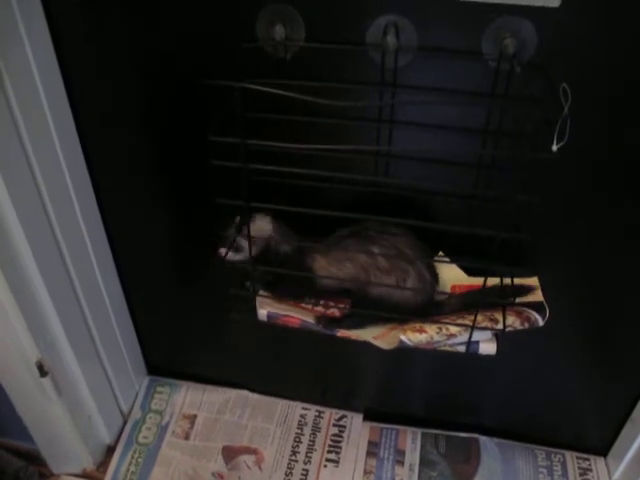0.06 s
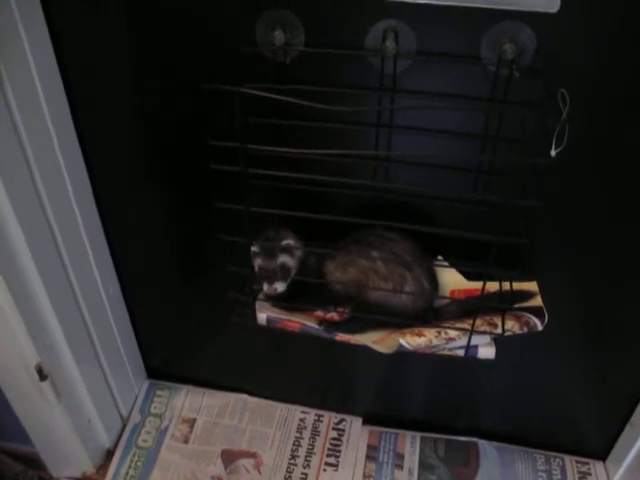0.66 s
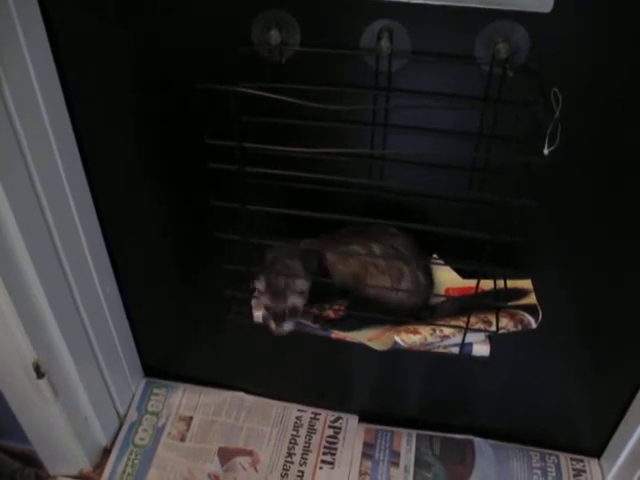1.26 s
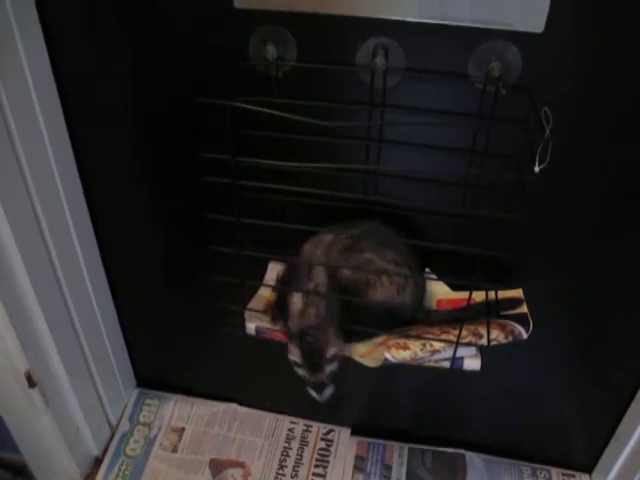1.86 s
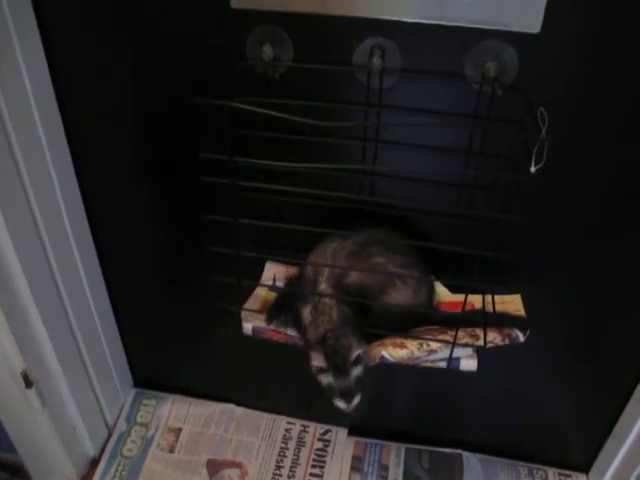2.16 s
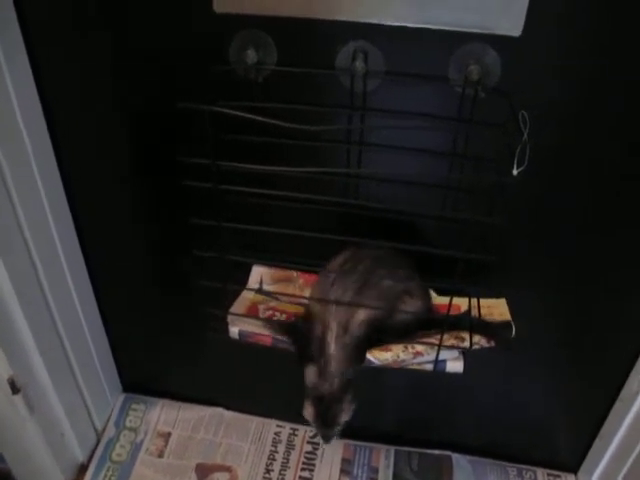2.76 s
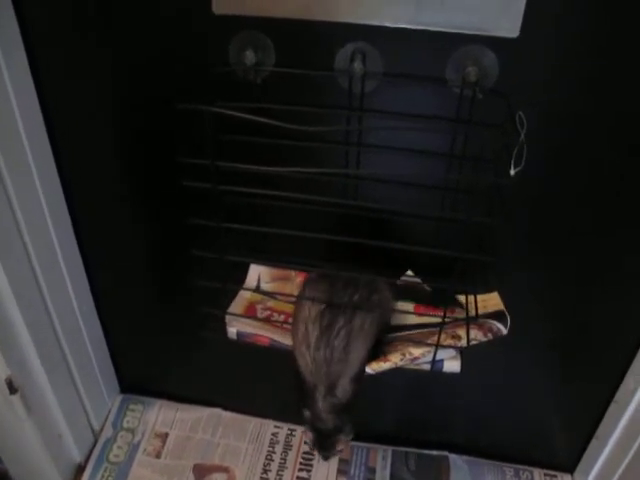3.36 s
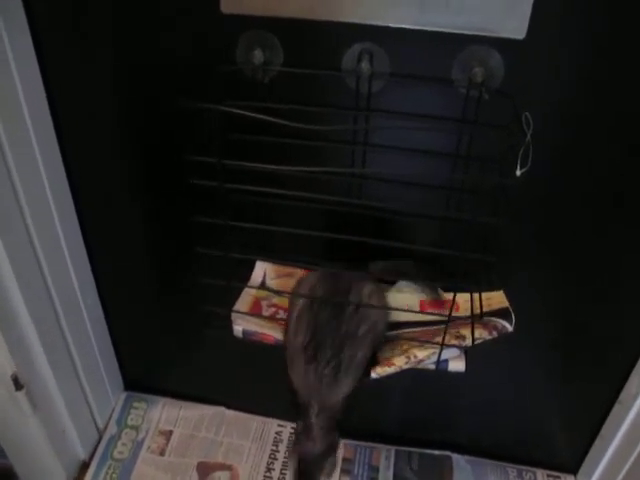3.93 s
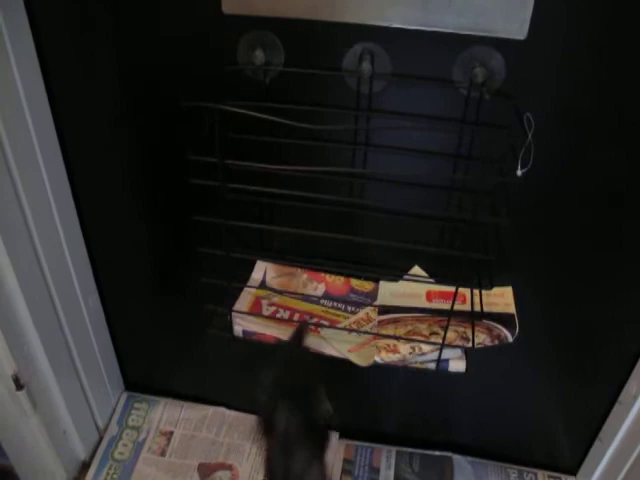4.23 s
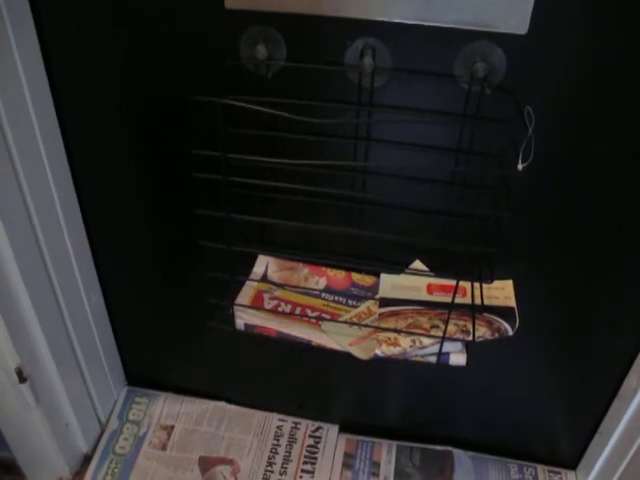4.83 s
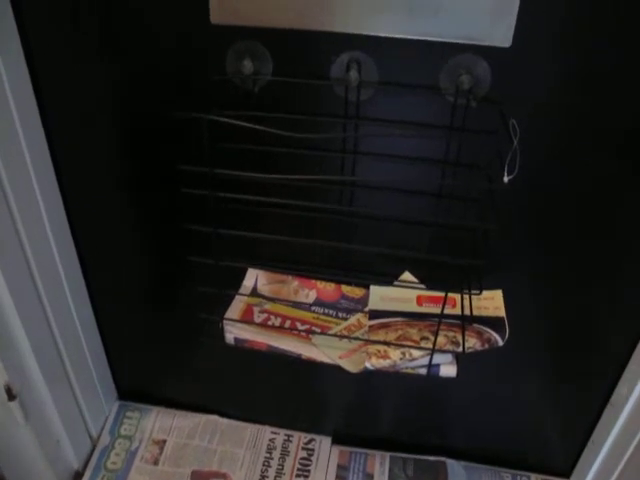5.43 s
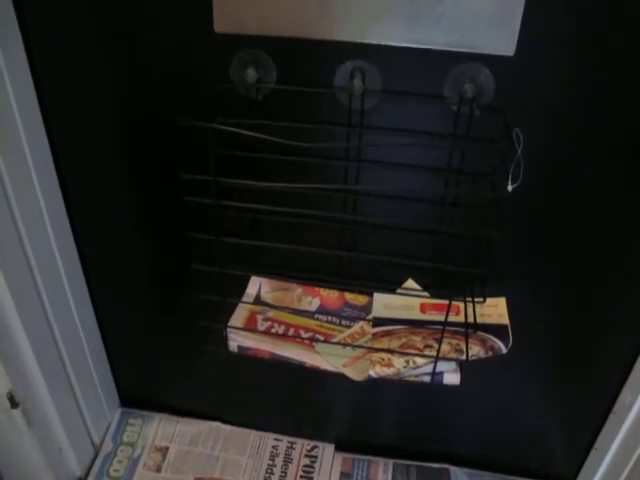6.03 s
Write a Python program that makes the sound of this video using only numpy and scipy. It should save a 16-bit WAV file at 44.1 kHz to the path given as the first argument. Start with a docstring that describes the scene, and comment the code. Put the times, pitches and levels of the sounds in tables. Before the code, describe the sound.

A ferret rustles paper in a wire basket, then climbs out with a loud crackle and a rattle against a door.

```python
"""In a small hall, over a soft hush, a low hum and a thin electronic whine, a ferret shifts on paper
leaflets in a wire mail basket hung on a door. Friction makes the paper rustle; creases crack and sheets
buckle under its paws. Stick-slip gives a squeak on the wire, a creak in a loaded sheet, then claw scrapes.
About four seconds in, the ferret slides over the rim and the basket rattles against the door.
It drops onto newspapers with a soft thud, and the rustling goes on faintly."""
import sys
import numpy as np
from scipy import signal
from scipy.fft import rfft, irfft, next_fast_len
from scipy.io import wavfile
from scipy.ndimage import map_coordinates

SR = 44100
rng = np.random.default_rng(int(sys.argv[2]) if len(sys.argv) > 2 else 0)


def digitize_waveform(pressure):
    """Quantize a signal to 16-bit integers and store it at the path in sys.argv[1].

    Rows of a 2-D input are taken as channels; values are limited to [-1, 1].
    """
    field = np.atleast_2d(pressure).T
    bounded = np.clip(field, -1, 1)
    quanta = np.round(bounded * 32767).astype(np.int16)
    wavfile.write(sys.argv[1], SR, quanta)


N = 268566


def amp(db):
    """Amplitude ratio of a level in decibels."""
    return 10 ** (np.asarray(db) / 20)


def unit(x):
    """Normalisation to an rms of 1."""
    return x / np.sqrt(np.mean(x ** 2) + 1e-20)


def along(points, hz):
    """Interpolation of (frequency [Hz], value) points on a logarithmic frequency axis."""
    f, v = np.transpose(points)
    return np.interp(np.log(hz + 1), np.log(f + 1), v)


def wobble(rate):
    """Random modulation: a smooth curve through `rate` random values a second."""
    return map_coordinates(rng.standard_normal(int(N * rate / SR) + 4), [np.arange(N) * rate / SR])


def colour(x, spectrum, size=4096):
    """Minimum-phase filtering to a given spectrum, conserving the power of white noise."""
    gain = unit(amp(along(spectrum, np.fft.rfftfreq(size, 1 / SR))))
    cepstrum = irfft(np.log(gain + 1e-6))
    cepstrum[1:size // 2] *= 2
    cepstrum[size // 2 + 1:] = 0
    return signal.fftconvolve(x, irfft(np.exp(rfft(cepstrum))))[:len(x)]


def fade(t, t60):
    """Exponential decay by 60 dB in t60 seconds."""
    return np.exp(-np.log(1000) * t / np.maximum(t60, 1e-4))


def add(track, s, sound):
    """Superposition of a sound on the track from time s."""
    part = track[max(round(s * SR), 0):][:len(sound)]
    part += sound[:len(part)]


def grains(count, rate, spread_db, smooth):
    """Shot noise: `rate` uneven impulses a second over a share of smooth noise, at an rms of 1."""
    cracks = np.zeros(count)
    at = np.flatnonzero(rng.random(count) < rate / SR)
    sizes = amp(spread_db * np.clip(rng.standard_normal(len(at)), -2, 2))
    cracks[at] = sizes * rng.choice([-1, 1], len(at))
    return unit(unit(cracks) + smooth * rng.standard_normal(count))


# Reverberation time of the hall: (frequency [Hz], T60 [s])
HALL_DECAY = [(150, 0.9), (1000, 0.42), (4000, 0.22), (12000, 0.17)]
def hall(x, wet_db, near_db=-6, near_t60=0.046):
    """Reverberation: direct sound, early reflections from door and walls, and a short diffuse tail."""
    hz, t, noise = signal.stft(rng.standard_normal(SR // 2), SR, nperseg=256)
    tail = signal.istft(noise * fade(t, along(HALL_DECAY, hz)[:, None]), SR, nperseg=256)[1]
    t = np.arange(len(tail)) / SR
    tail *= 1 - np.exp(-t / 0.0016)
    walls = grains(len(t), rate=1500, spread_db=6, smooth=0.79) * fade(t, near_t60) * (t > 0.002)
    response = amp(wet_db) * tail / np.linalg.norm(tail) + amp(near_db) * walls / np.linalg.norm(walls)
    response[0] += 1  # direct sound
    return signal.fftconvolve(x, response)


# Spectrum of the room hush: (frequency [Hz], relative density [dB])
HUSH_SPECTRUM = [(25, -28), (60, -15.5), (100, -5), (140, -5.5), (300, -4), (620, -4), (900, -7),
                 (1400, -9.5), (4000, -13), (6000, -17), (10500, -20.5), (15500, -28)]
def background(hush_db=-63.7, hum_hz=216, hum_db=-77, whine_hz=5880, whine_db=-70):
    """Ambient noise: a broadband hush and two slightly modulated tones, a hum and an electronic whine."""
    hush = amp(hush_db + 0.125 * wobble(4.3)) * colour(rng.standard_normal(N), HUSH_SPECTRUM)
    hum_gain = amp(hum_db + 0.47 * wobble(2.57))
    hum = np.sin(2 * np.pi * np.cumsum(hum_hz + 3 * wobble(3.6)) / SR)
    whine_gain = amp(whine_db + 0.42 * wobble(7.8))
    whine = np.sin(2 * np.pi * np.cumsum(whine_hz + 1.42 * wobble(6.6)) / SR)
    return hush + hum_gain * hum + whine_gain * whine


# Steady drag of the body over the paper: (time [s], relative level [dB])
BODY_DRAG = [(0, -62.5), (0.22, -64.5), (0.32, -73), (0.55, -82), (1.11, -79), (1.22, -64), (1.5, -63),
             (1.58, -77), (1.72, -59.5), (2.11, -60), (2.19, -71), (3.35, -64), (3.52, -61), (4.5, -59.5),
             (4.62, -70), (5.33, -68), (5.62, -61.5), (6.09, -60.5)]
# Pushes of paw or flank: (peak time [s], length [s], relative level [dB], sheet over surface [dB])
PUSHES = [(0.2, 0.093, -55, -2.5), (1.735, 0.183, -56.5, -3), (1.876, 0.073, -55.5, -4.5),
          (2.294, 0.25, -58, 1), (2.484, 0.39, -62, 0), (2.794, 0.12, -52.5, 0), (2.99, 0.062, -57, 3.5),
          (3.1, 0.13, -53, 2.5), (3.184, 0.12, -50.5, 2), (3.663, 0.084, -46.5, 4), (3.947, 0.09, -43.5, 1),
          (4.059, 0.11, -33.5, 0), (4.171, 0.048, -32.5, -1), (4.232, 0.16, -60, 13),
          (4.331, 0.022, -51, 2.5), (4.41, 0.052, -48, 7.5), (4.695, 0.06, -58.5, 6.5)]
def shifting(drag_sheet_db=-1, swell_share=0.44, roundness=1.363):
    """Incoherent addition: drag and pushes sum in power, giving the gains of paper surface and sheet."""
    t = np.arange(N) / SR
    drag_db = np.interp(t, *np.transpose(BODY_DRAG))
    surface, sheet = amp(drag_db) ** 2, amp(drag_db + drag_sheet_db) ** 2
    for peak, length, db, sheet_db in PUSHES:
        away = np.abs(t - peak) / (length * np.where(t < peak, swell_share, 1 - swell_share))
        push = amp(db) * np.exp(-away ** roundness)  # roundness 1 is a cusp, 2 a bell
        surface += push ** 2
        sheet += (amp(sheet_db) * push) ** 2
    return np.sqrt(surface), np.sqrt(sheet)


# Spectrum of the paper's crisp surface: (frequency [Hz], relative density [dB])
SURFACE_SPECTRUM = [(1500, -31), (3000, -6.5), (4800, -5.5), (7000, -3), (9000, 1), (10100, 1.5),
                    (11000, -6.5), (12600, -12.5), (15500, -26)]
# Spectrum of the whole vibrating sheet: (frequency [Hz], relative density [dB])
SHEET_SPECTRUM = [(150, -26.5), (400, -5), (800, -5), (1350, 1), (1900, 0), (2700, -1.5), (4000, -3),
                  (6000, -8.5), (10000, -39.5)]
def rustle(surface_db=1.5, sheet_db=-2.0, catches_per_s=1400, spread_db=3.5, flutter_db=1.6164):
    """Sliding friction: paper fibres catch in clumps, hiss on the surface and shake the sheet."""
    surface_gain, sheet_gain = shifting()
    clumps = unit(amp(flutter_db * (wobble(45) + 0.58 * wobble(170))))
    snags = grains(N, rate=60, spread_db=4.0, smooth=0)  # rarer catches, shared by surface and sheet
    surface_force = clumps * unit(grains(N, catches_per_s, spread_db, smooth=1.0) + 0.12 * snags)
    sheet_force = clumps * unit(grains(N, catches_per_s, spread_db, smooth=0.96) + 0.28 * snags)
    surface = surface_gain * amp(surface_db) * colour(surface_force, SURFACE_SPECTRUM)
    sheet = sheet_gain * amp(sheet_db) * colour(sheet_force, SHEET_SPECTRUM)
    return hall(surface + sheet, wet_db=-12.5, near_db=-8.5)[:N]


def settling(per_s=2.0, level_db=-58, spread_db=1, sheet_db=0, count=40):
    """Relaxation as a Poisson process: rows of faint crinkles from the crumpled paper."""
    times = np.cumsum(rng.exponential(1 / per_s, count))
    levels = level_db + spread_db * rng.standard_normal(count)
    return [(s, db, sheet_db) for s, db in zip(times, levels) if s < N / SR]


# Creases giving way: (time [s], relative level [dB], relative weight of the sheet [dB])
CREASES = [(0.174, -42.5, 4), (0.389, -50.5, 1), (1.3416, -36, -29.5), (1.4834, -39.5, -3),
           (2.1195, -44.5, -11), (2.1725, -44.5, -1), (2.2816, -43.5, -2), (2.5903, -37, -3.5),
           (2.832, -35.5, -24), (3.1681, -32.5, -11.5), (3.5974, -38.5, 2.5), (3.893, -35, 1.5),
           (4.0227, -14, -3.5), (4.154, -13.5, -22), (4.1616, -15.5, -28), (4.2211, -28.5, 2),
           (4.2684, -31.5, 19), (4.3162, -37, 11), (4.3795, -36.5, -10), (4.6699, -39, -2),
           (4.9961, -44, 3), (5.0915, -46, -2), (5.4259, -46.5, -12)]
def crinkles(crack_t60=0.016, crack_db=-6, spray_t60=0.2, spray_db=-22):
    """Release of elastic energy: a crease yields in one sharp crack and a spray of smaller ones."""
    out, t = np.zeros(N), np.arange(SR // 4) / SR
    envelope = amp(crack_db) * fade(t, crack_t60) + amp(spray_db) * fade(t, spray_t60)
    for s, db, sheet_db in CREASES + settling():
        surface = colour(rng.standard_normal(len(t)), SURFACE_SPECTRUM)
        sheet = colour(rng.standard_normal(len(t)), SHEET_SPECTRUM)
        burst = envelope * unit(surface + amp(sheet_db + 3) * sheet)
        add(out, s + 0.0005, amp(db) * hall(burst, wet_db=-8, near_db=-8))
    return out


# Sheets buckling in one pop: (time [s], relative peak level [dB], frequency [Hz])
BUCKLES = [(0.241, -48, 2140), (2.239, -41.5, 980), (2.774, -44, 795), (3.19, -34.5, 2820),
           (3.499, -42, 1750), (4.06, -8.5, 2640), (4.069, -20, 1500), (4.378, -32, 880),
           (4.501, -34, 1570)]
def pops(rows, t60_cycles=3.6, gain_db=2):
    """Snap-through buckling: a sheet swings for a cycle or two, and the air follows its velocity."""
    out, t = np.zeros(N), np.arange(SR // 20) / SR
    for s, db, hz in rows:
        displacement = np.sin(2 * np.pi * hz * t) * fade(t, t60_cycles / hz) * (1 - np.exp(-t * hz))
        velocity = np.diff(displacement)
        velocity *= amp(db + gain_db) / np.abs(velocity).max()
        add(out, s + 0.001, hall(velocity, wet_db=-8.5, near_db=-6.5))
    return out


def slip_times(length, first_gap, growth=1.2, count=16):
    """Stick-slip timing: over `length` seconds the gaps widen geometrically as the load eases."""
    times = np.append(0, np.cumsum(first_gap * growth ** np.arange(count)))
    return times[times <= length]


def squeak(start_s=1.043, pitch_hz=2790, rise_s=0.002, first_db=-44.5, weaken=0.87, rasp_db=-17):
    """Stick-slip on the wire: ever weaker slips, each a raspy tone burst at nearly the same pitch."""
    out, t = np.zeros(N), np.arange(SR // 20) / SR
    swell = (t / rise_s * np.exp(1 - t / rise_s)) ** 2
    for k, s in enumerate(slip_times(length=0.066, first_gap=0.0082)):
        tone = np.sin(2 * np.pi * pitch_hz * (1 + 0.015 * rng.standard_normal()) * t)
        rasp = amp(rasp_db) * colour(rng.standard_normal(len(t)), SHEET_SPECTRUM)
        add(out, start_s + s, amp(first_db) / (k + 1) ** weaken * swell * (tone + rasp))
    return hall(out, wet_db=-4.5)[:N]


# Creaking sheets: (start [s], length [s], first gap [s], relative first peak [dB], frequency [Hz])
SHEET_CREAKS = [(1.353, 0.11, 0.0062, -37.5, 1170), (4.39, 0.03, 0.0105, -28, 965)]
def creaking(loss_db_per_doubling=1.6, spread_db=1, detune=0.07):
    """Stick-slip in a loaded sheet: rows of pops that weaken with their count and scatter in pitch."""
    rows = []
    for start, length, first_gap, first_db, hz in SHEET_CREAKS:
        for k, s in enumerate(slip_times(length, first_gap)):
            db = first_db - loss_db_per_doubling * np.log2(k + 1) + spread_db * rng.standard_normal()
            rows.append((start + s, db, hz * np.exp(detune * rng.standard_normal())))
    return rows


# Claws dragging over a sheet: (time [s], length [s], resonance [Hz], level [dB])
CLAW_DRAGS = [(2.003, 0.053, 5100, -59.5), (2.116, 0.015, 5130, -52.5), (2.426, 0.041, 2200, -60),
              (3.498, 0.049, 1720, -57.5), (3.953, 0.021, 2450, -35), (3.969, 0.024, 1797, -36.5),
              (3.99, 0.018, 2850, -33), (4.069, 0.012, 1470, -32), (4.477, 0.06, 1380, -52),
              (4.74, 0.05, 1955, -59.5)]
def scrapes(half_width=0.181):
    """Forced resonance: a claw sticks and slips, exciting one mode of the sheet under it."""
    out = np.zeros(N)
    for s, length, hz, db in CLAW_DRAGS:
        t = np.arange(round(length * SR)) / SR
        slips = grains(len(t), rate=820, spread_db=1.5, smooth=0.24)
        band_hz = [hz * (1 - half_width), hz * (1 + half_width)]
        resonance = signal.butter(2, band_hz, "bandpass", fs=SR, output="sos")
        rasp = unit(signal.sosfilt(resonance, slips)) * np.sqrt(np.sin(np.pi * t / length))
        add(out, s, amp(db) * hall(rasp, wet_db=-10.0, near_db=-9.5))
    return out


# The animal's weight striking basket, door and floor: (time [s], relative level [dB])
BLOWS = [(2.773, -48.5), (4.022, -29), (4.133, -27), (4.164, -26), (4.38, -37)]
# Spectrum of a knock on the door: (frequency [Hz], relative density [dB])
DOOR_SPECTRUM = [(30, -53), (70, -26), (120, -4), (200, -2.5), (330, -2), (600, 2), (900, 3), (1600, -19),
                 (4000, -54)]
# Modes of the wire frame and door: (frequency [Hz], relative level [dB], T60 [s])
BASKET_MODES = [(152.2, -5.5, 1), (209.3, 2.5, 0.339), (296, -6, 0.25), (417, 1.5, 0.31), (487, -4, 0.25),
                (599, 4.5, .25), (818, 1.5, 0.83), (902, 1, 0.72), (1130, -2.5, 0.8), (1370, -3, 0.28),
                (1547, -14.5, 0.26), (2296, -12, 0.23), (2644, 3, .22)]
def basket_rattle(knock_db=-7, knock_t60=0.11, ring_db=-22, chatter_rad=0.03):
    """Impact excitation: blows knock the door and ring the basket; loose wires chatter, blurring its modes."""
    out, t = np.zeros(N), np.arange(SR) / SR
    for s, db in BLOWS:
        knock = colour(rng.standard_normal(len(t)) * fade(t, knock_t60), DOOR_SPECTRUM)
        ring = np.zeros(len(t))
        for hz, mode_db, t60 in BASKET_MODES:
            envelope = amp(mode_db + rng.normal(0, 2.0)) * fade(t, t60)
            phase = 2 * np.pi * (hz * t + rng.random())
            chatter = chatter_rad * np.cumsum(rng.standard_normal(len(t)))  # random walk of phase
            ring += envelope * np.sin(phase + chatter)
        add(out, s, amp(db + knock_db) * hall(knock, wet_db=-8.5))
        add(out, s, amp(db + ring_db) * ring * (1 - np.exp(-t / 0.0027)))
    return out


def landing(start_s=4.402, hz=78, gain_db=-54, rise_s=0.012, t60=0.203):
    """Damped oscillation: the hind legs reach the floor with a soft, deep thud."""
    out, t = np.zeros(N), np.arange(SR // 2) / SR
    envelope = fade(t, t60) * (1 - np.exp(-t / rise_s))
    add(out, start_s, amp(gain_db) * envelope * np.sin(2 * np.pi * hz * t))
    return out


def scene():
    """Superposition: paper, basket, floor and room sum in one channel."""
    paper = rustle() + crinkles() + pops(BUCKLES + creaking()) + scrapes()
    return (paper + basket_rattle() + landing() + squeak() + background())[None]


def record(dry, notch_hz=11850, half_width_hz=480, top_hz=15800):
    """Frequency response of the microphone: a deep notch in the high treble and a sharp band limit."""
    size = next_fast_len(N + SR // 2)
    hz = np.fft.rfftfreq(size, 1 / SR)
    notch = 1 - 1 / (1 + ((hz - notch_hz) / half_width_hz) ** 2)
    return irfft(rfft(dry, size) * notch * (hz < top_hz), size)[:, :N]


dry = scene()
out = record(dry)
digitize_waveform(out)
```